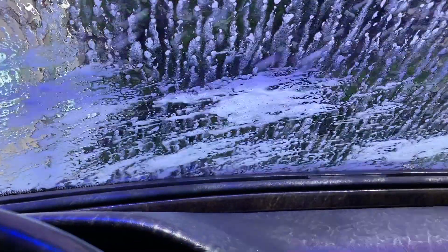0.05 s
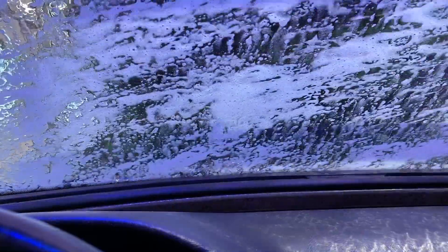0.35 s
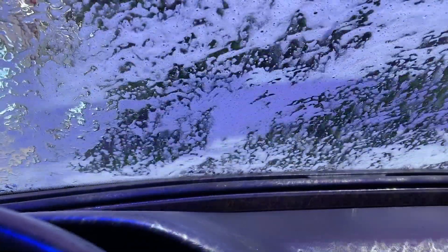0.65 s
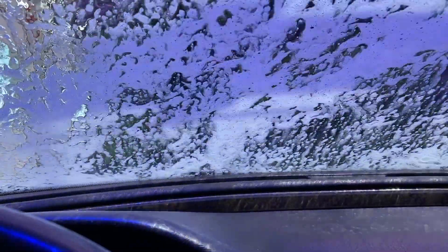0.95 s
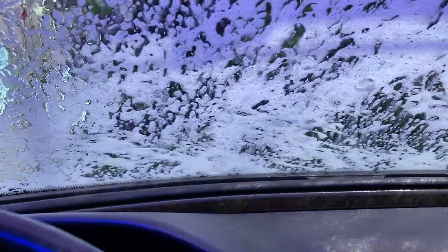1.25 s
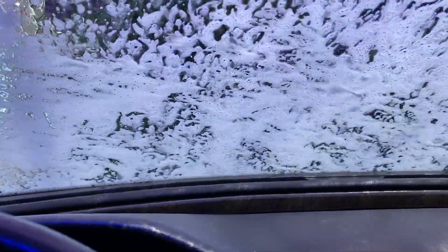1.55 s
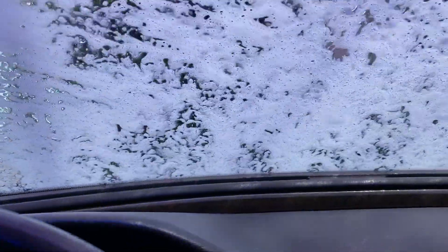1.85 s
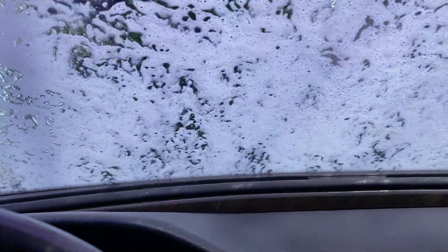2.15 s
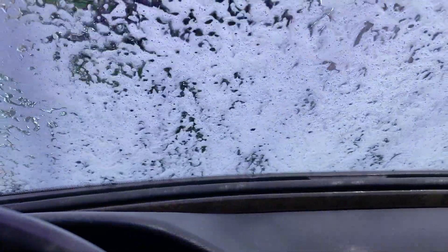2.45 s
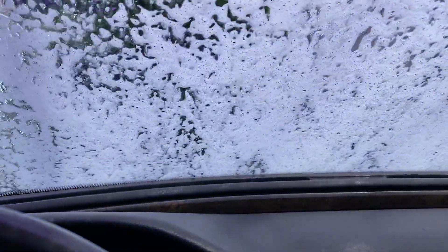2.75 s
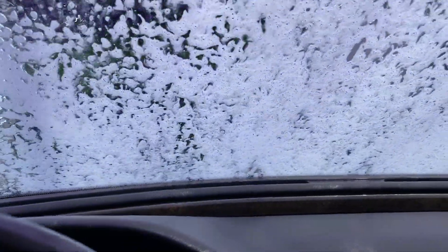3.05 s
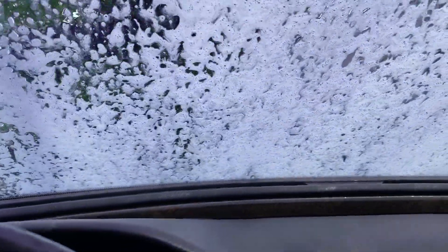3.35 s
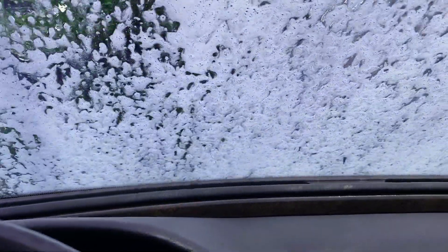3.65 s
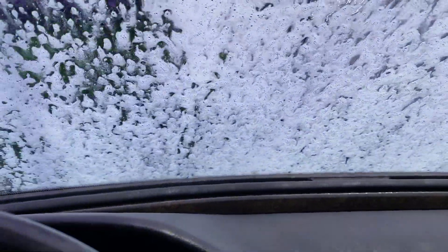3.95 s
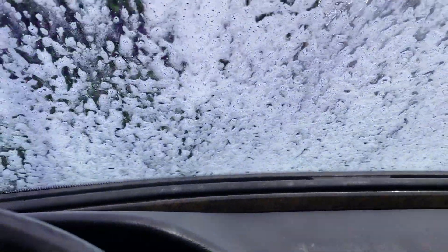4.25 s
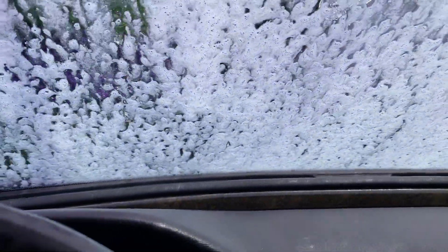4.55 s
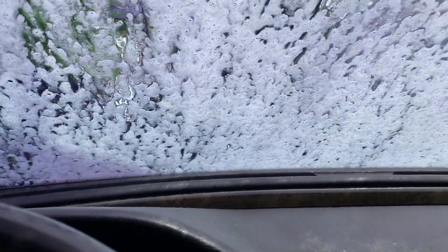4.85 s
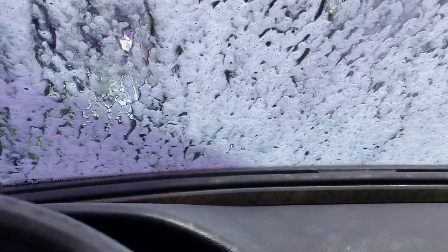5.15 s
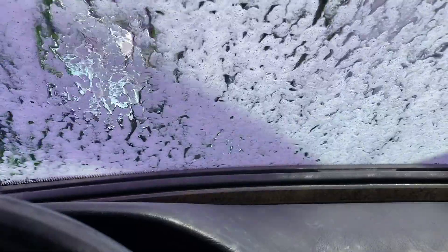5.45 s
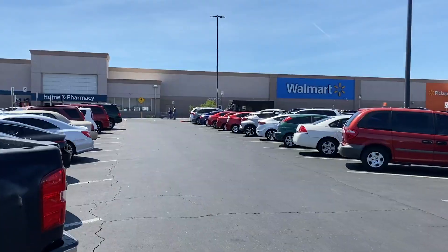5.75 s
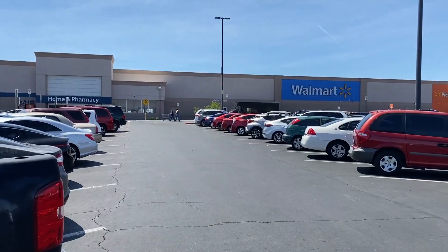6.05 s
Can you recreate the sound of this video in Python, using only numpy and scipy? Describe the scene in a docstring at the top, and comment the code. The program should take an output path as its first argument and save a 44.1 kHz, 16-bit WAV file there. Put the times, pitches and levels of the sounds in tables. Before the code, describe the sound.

Heard from the front seat in an automatic car wash, soaked cloth strips slap and scrub the windshield and drum on the panels. Foam hisses, droplets spatter and the cabin throbs with a deep boom. The slapping thins out, a brief rubbery whine judders, and a water jet swells. A sudden cut leads to a quiet parking lot with a low rumble and soft microphone bumps.

```python
"""Car wash from inside, then a parking lot.

Soaked cloth strips slap and scrub the windshield and drum on the panels; water spatters on the glass
and the closed cabin booms. The brush moves off, something whines like wet rubber on paint, a jet swells.
Cut to a quiet parking lot: a low rumble with a few soft bumps at the microphone."""
import sys
import numpy as np
from scipy import signal
from scipy.fft import rfft, irfft, next_fast_len
from scipy.io import wavfile
from scipy.ndimage import uniform_filter1d, map_coordinates

SR = 44100
rng = np.random.default_rng(int(sys.argv[2]) if len(sys.argv) > 2 else 0)


def master(y):
    """Save y as 16-bit WAV."""
    cut = np.clip(np.atleast_2d(y).T, -1, 1)
    pcm = np.round(cut * 32767)  # scale
    wavfile.write(sys.argv[1], SR, pcm.astype(np.int16))


N = 268745
TIME_S = np.arange(N) / SR
SIDES = np.array([[0.5], [-0.5]])  # splits a difference between left and right

# cloth at the front of the car: time_s, panel_ring_db, windshield_flex_db
FRONT_LEVELS = [(0, -4, 1), (0.7, -3, 8), (1.3, -2.5, -4), (2.2, -4, -2), (2.7, -0.5, 1.5),
                (3.2, -5.5, -10.5), (4.1, -9.5, -6), (4.6, -15, 1), (5.7, -6.5, -0.5)]
# cloth on a panel: freq_hz, density_db
CLOTH_SPECTRUM = [(100, 1), (215, 0.5), (300, -3), (430, -0.5), (530, -5.5), (700, -4), (830, -10),
                  (1080, -8), (1300, -27.5), (2000, -22.5), (5000, -55.5)]
# jet on the glass, also ticks and hiss tail: freq_hz, density_db
SIZZLE_SPECTRUM = [(1000, -20.5), (2000, -7), (2700, 0.5), (3250, -0.5), (4200, -5.5), (5300, -13.5),
                   (7000, -20.5), (10000, -24.5), (15000, -57)]


def amp(db):
    """Decibels to gain."""
    return 10 ** (np.asarray(db) / 20)


def unit(x):
    """x at rms 1."""
    return x / np.sqrt(np.mean(x ** 2) + 1e-20)


def bell(x, centre, half_width):
    """Gaussian: 1 at centre, 1/e at half_width from it."""
    return np.exp(-((x - centre) / half_width) ** 2)


def swell(age_s, peak_s):
    """Envelope of a blow: 0 before it, 1 at peak_s, then fading."""
    u = np.maximum(age_s, 0) / peak_s
    return u * np.exp(1 - u)


def along(points, hz):
    """(freq_hz, value) points read on a log axis."""
    freq_hz, values = np.transpose(points)
    return np.interp(np.log(hz + 1), np.log(freq_hz + 1), values)


def curve(rows, column=1):
    """One column of a timed table, per sample."""
    columns = np.transpose(rows)
    return np.interp(TIME_S, columns[0], columns[column])


def wobble(rate_hz):
    """Smooth random curve, rate_hz knots a second."""
    knots = rng.standard_normal(int(N * rate_hz / SR) + 4)
    return map_coordinates(knots, [TIME_S * rate_hz])


def filtered(x, response):
    """x times a complex response of frequency."""
    size = next_fast_len(N + SR // 2)
    return irfft(rfft(x, size) * response(np.fft.rfftfreq(size, 1 / SR)), size)[..., :N]


def colour(x, spectrum):
    """Spectral shaping that preserves the power of white noise."""
    return filtered(x, lambda hz: unit(amp(along(spectrum, hz))))


def white():
    """Two independent noises."""
    return rng.standard_normal((2, N))


def patter(rate_hz, spread_db, life_s):
    """Tiny noise bursts of random time and size, at rms 1."""
    hits = rng.random(N) < rate_hz / SR
    sizes = amp(spread_db * np.clip(rng.standard_normal(N), -2, 2))
    power = signal.lfilter([1], [1, -np.exp(-2 / (life_s * SR))], hits * sizes ** 2)
    return unit(np.sqrt(power) * white())


def even(x, span_s):
    """x with swells slower than span_s levelled."""
    span = int(span_s * SR)
    power = uniform_filter1d(np.mean(x ** 2, axis=0), span + 1)
    return x / np.sqrt(np.abs(uniform_filter1d(power, span // 2 + 1)) + 1e-12)


def stereo(pair):
    """Independent pair to left and right: alike in the bass, apart in the treble."""
    # left-right likeness: freq_hz, correlation
    likeness = [(30, 0.99), (60, 1), (130, 0.93), (290, 0.64), (640, 0), (1400, 0), (2500, 0), (4000, 0),
                (8000, 0.34), (15000, 0.032)]

    def mid_side_gains(hz):
        angle = np.arccos(np.clip(along(likeness, hz), -1, 1)) / 2
        return np.array([np.cos(angle), np.sin(angle)])

    mid, side = filtered(pair, mid_side_gains)
    return np.array([mid + side, mid - side])


def cabin(x, t60_s, wet_db, left_lag_samples=7, size=4096):
    """The glass is nearer the right microphone; the trim's short tail changes as the water moves."""
    x = np.array([np.pad(x[0], (left_lag_samples, 0))[:N], x[1]])
    t = np.arange(size) / SR
    window = np.sin(np.pi * np.arange(size) / size)
    padded = np.pad(x, ((0, 0), (size, 2 * size)))
    wet = np.zeros_like(padded)
    for i in range(0, N + size, size // 2):
        tail = rng.standard_normal((2, size)) * amp(-60 * t / t60_s)
        tail /= np.linalg.norm(tail, axis=1, keepdims=True)
        wet[:, i:i + 2 * size - 1] += signal.fftconvolve(padded[:, i:i + size] * window, tail, axes=1)
    return (x + amp(wet_db) * wet[:, size:size + N]) / np.hypot(1, amp(wet_db))


def windshield(x):
    """Water is heard through the glass and its narrow resonances."""
    # glass resonances: centre_hz, half_width_hz, lift_db
    modes = [(1805, 56, 0.5), (2880, 39, 3), (4190, 48, -2), (4628, 72, 2.5), (5040, 60, 1), (5480, 35, 3),
             (6150, 44, 2)]
    return filtered(x, lambda hz: amp(sum(db * bell(hz, centre, half) for centre, half, db in modes) - 1))


def microphone_bumps(thud_peak_s=0.0096, cutoff_hz=1600):
    """Soft bumps at the microphone: each a dull knock over a low thud."""
    # bumps: start_s, knock_db, thud_db, knock_peak_s, thud_hz
    bumps = [(5.745, -26.5, -25, 0.0072, 89), (5.776, -23.5, -27, .0058, 89.5),
             (5.847, -23, -28, 0.0072, 100), (5.859, -36, -18, .005, 145.4),
             (5.8827, -10.5, -17.5, 0.0014, 65), (5.919, -27.5, -22, 0.0089, 95),
             (5.947, -23.5, -21, 0.0068, 79.6)]
    # knock: freq_hz, density_db
    knock_spectrum = [(80, -17), (200, 10.5), (420, 4), (750, -4), (1100, -40), (3000, -65)]
    knock = even(stereo(colour(white(), knock_spectrum)), span_s=0.0103)
    out = np.zeros((2, N))
    for start_s, knock_db, thud_db, knock_peak_s, thud_hz in bumps:
        age_s = TIME_S - start_s
        out += amp(knock_db) * swell(age_s, knock_peak_s) * knock
        out += amp(thud_db) * swell(age_s, thud_peak_s) * np.sin(2 * np.pi * thud_hz * age_s)
    return filtered(out, lambda hz: 1 / (1 + (hz / cutoff_hz) ** 4))


def parking_lot():
    """Low outdoor rumble; something small ticks twice."""
    # rumble: time_s, level_db
    levels = [(5.76, -33.5), (5.978, -31), (6.09, -36)]
    # rumble: freq_hz, density_db
    spectrum = [(20, -28), (55, 10), (80, -3.5), (140, -4), (200, -16), (550, -21), (1000, -25),
                (2000, -40.5), (3200, -51), (7000, -65.5), (15000, -85)]
    # ticks: time_s, peak_db
    ticks = [(5.872, -51), (5.982, -52)]
    tick_gain = sum(amp(db) * bell(TIME_S, s, 0.0007) for s, db in ticks)
    rumble = even(stereo(colour(white(), spectrum)), span_s=0.042)
    return amp(curve(levels) + 4) * rumble + tick_gain * colour(white(), SIZZLE_SPECTRUM)


def hiss_tail(start_s, level_db=-42, peak_s=0.0071):
    """A brief high hiss fades just after the cut."""
    return amp(level_db) * swell(TIME_S - start_s, peak_s) * colour(white(), SIZZLE_SPECTRUM)


def cabin_boom(throb_half_s=0.03):
    """A deep cabin boom swells and throbs unevenly."""
    # boom between throbs: time_s, level_db
    levels = [(0, -24), (0.55, -27), (1.1, -29), (1.7, -21.5), (2.3, -25.5), (3.3, -24), (4.5, -25),
              (5.1, -20), (5.7, -22.5)]
    # throbs: time_s, peak_db
    throbs = [(0.18, -28), (0.43, -16), (1.5, -19.5), (1.68, -10), (1.93, -16), (2.04, -11), (2.14, -19),
              (2.35, -19), (2.47, -13), (2.61, -14), (2.81, -20.5), (3.03, -16), (3.19, -20), (3.51, -19),
              (3.62, -17), (3.72, -28), (3.98, -25), (4.08, -25), (4.18, -15), (4.25, -20), (4.4, -13),
              (4.52, -19.5), (4.62, -19), (4.68, -16.5), (4.735, -16.5), (4.88, -20), (5.23, -17.5),
              (5.4, -14.5), (5.57, -17.5), (5.68, -13)]
    # boom: freq_hz, density_db
    spectrum = [(15, -52), (28, -19), (38, -9.5), (47, 5), (56, -7.5), (70, -7.5), (110, -30), (200, -100)]
    boom = even(stereo(colour(white(), spectrum)), span_s=0.11)
    throb_gain = sum(amp(db) * bell(TIME_S, s, throb_half_s) for s, db in throbs)
    return np.hypot(amp(curve(levels)), throb_gain) * boom


def roof_drumming():
    """Heavy cloth drums on the roof in swells and flexes the windshield."""
    # drumming: time_s, level_db
    levels = [(0, -24), (0.2, -14.5), (0.32, -19.5), (0.88, -20.5), (1.05, -18.5), (1.3, -17), (1.6, -21),
              (2.15, -20.5), (2.65, -25.5), (3.3, -24), (3.72, -23), (3.9, -25.5), (4.2, -24), (4.75, -28),
              (5.05, -21.5), (5.3, -28.5), (5.58, -17.5), (5.74, -25)]
    # roof panel: freq_hz, density_db
    roof_spectrum = [(60, -44), (100, -20), (122, 6), (150, 1.5), (175, -5.5), (230, -15.5), (400, -18),
                     (900, -99)]
    # flexing windshield: freq_hz, density_db
    flex_spectrum = [(45, -30), (62, 1.5), (76, 3.5), (100, 3.5), (120, 3), (180, -23), (400, -82)]
    roof = colour(patter(rate_hz=260, spread_db=-3, life_s=0.011), roof_spectrum)
    flex = amp(curve(FRONT_LEVELS, column=2)) * colour(white(), flex_spectrum)
    return amp(curve(levels) + 0.32) * even(stereo(roof + flex), span_s=0.15)


def door_drumming():
    """The doors ring as the brushes move on to them."""
    # ringing: time_s, level_db
    levels = [(0, -33.5), (2.6, -57), (3.2, -43), (4.3, -34.5), (5.0, -33.5), (5.7, -32.5)]
    # door panel: freq_hz, density_db
    spectrum = [(140, -10), (190, 5), (225, -12), (265, 0.5), (330, -10), (600, -71)]
    pats = patter(rate_hz=200, spread_db=-2.5, life_s=0.0066)
    return amp(curve(levels)) * stereo(colour(pats, spectrum))


def roof_thuds(peak_s=0.015):
    """The roof rings low and briefly under single heavy strips."""
    # thuds: start_s, peak_db, pitch_hz
    thuds = [(0.025, -14.5, 113), (1.256, -15.5, 135.3), (3.296, -13.5, 143), (3.449, -18, 135),
             (3.75, -11.5, 132), (3.79, -16.5, 130), (4.115, -22, 140), (4.37, -22.5, 135),
             (4.925, -23, 145), (5.076, -21.5, 144), (5.385, -20, 130)]
    return sum(amp(db) * swell(TIME_S - s, peak_s) * np.sin(2 * np.pi * hz * (TIME_S - s))
               for s, db, hz in thuds)


def whine(jitter=0.018, rough_db=3, left_lead_rad=1.7):
    """Rough, juddering tone, as of wet rubber dragging on paint."""
    # judders: time_s, pitch_hz, level_db, half_length_s
    judders = [(4.814, 750, -33, 0.01), (4.867, 701, -28.5, .022), (4.922, 709, -36, 0.022),
               (4.997, 737, -28, 0.015), (5.04, 758, -29, .013), (5.109, 745, -33, 0.024),
               (5.165, 732, -30.5, 0.02), (5.21, 732, -36, 0.022), (5.262, 752, -27.5, 0.024)]
    drag = sum(amp(db) * bell(TIME_S, s, half_s) for s, _, db, half_s in judders)
    pitch_hz = curve(judders) * (1 + jitter * wobble(220))
    phase = 2 * np.pi * np.cumsum(pitch_hz) / SR
    roughness = amp(rough_db * wobble(130))
    return drag * unit(roughness * np.sin(phase + left_lead_rad * SIDES))


def scrubbing(ring_cutoff_hz=2200):
    """Strip after strip pats the body; those at the front ring the panels."""
    # cloth on the panels: time_s, level_db
    levels = [(0.04, -23.5), (0.45, -24.5), (0.7, -23), (1.37, -26), (1.92, -23), (3.51, -31), (3.65, -28),
              (4.25, -36), (5.05, -28), (5.68, -27.5)]
    # front panel resonances: centre_hz, width_hz, gain_db, left_lead_rad
    modes = [(286.2, 12, 4, 0.78), (383.7, 15, -3, -1.1), (614.5, 22, 1, -1.02), (906, 41, -6.5, -1.05),
             (1409, 45, -9, -1.8)]

    def panel_response(hz):
        response = 0
        for k, (centre_hz, width_hz, gain_db, left_lead_rad) in enumerate(modes):
            resonance = 1j * hz * width_hz / (centre_hz ** 2 - hz ** 2 + 1j * hz * width_hz)
            response += (-1) ** k * amp(gain_db) * np.exp(1j * left_lead_rad * SIDES) * resonance
        return response / (1 + (hz / ring_cutoff_hz) ** 4)

    pats = unit(colour(patter(rate_hz=380, spread_db=3, life_s=0.011), CLOTH_SPECTRUM))
    ring = unit(filtered(patter(rate_hz=300, spread_db=1, life_s=0.0027)[0], panel_response))
    force = amp(curve(levels) + 1.5 + 1.17 * wobble(21.89))
    ring_gain = amp(curve(FRONT_LEVELS) + 0.5 + 2.6 * wobble(14))
    return force * even(stereo(pats) + ring_gain * ring, span_s=0.034)


def panel_thumps(focus_db=14, focus_octaves=0.39):
    """Heavy strips land: short, hollow bursts, each at the pitch of the struck spot."""
    # thumps: start_s, peak_db, pitch_hz, peak_s
    thumps = [(0.104, -26, 400, 0.0073), (0.662, -21, 330, .009), (0.782, -21, 730, 0.008),
              (0.861, -21, 960, 0.0051), (0.866, -18, 308, 0.0076), (0.977, -21.5, 342, 0.0051),
              (1.038, -21.5, 900, 0.01), (1.121, -27.5, 600, 0.0039), (1.665, -18, 674, .008),
              (1.944, -23.5, 1010, 0.0077), (2.126, -16.5, 620, 0.0052), (2.181, -16.5, 610, 0.0056),
              (2.738, -19.5, 456, 0.004), (3.451, -25, 398, 0.0075), (3.82, -33.5, 352, 0.0065),
              (5.629, -23, 394, 0.0049)]
    out = np.zeros((2, N))
    t = np.arange(SR // 8) / SR
    hz = np.fft.rfftfreq(len(t), 1 / SR)
    panel = stereo(colour(white(), CLOTH_SPECTRUM) * amp([[0], [-3]]))
    for start_s, peak_db, pitch_hz, peak_s in thumps:
        at = slice(int(start_s * SR), int(start_s * SR) + len(t))
        focus = amp(focus_db * bell(np.log2(hz + 1), np.log2(pitch_hz), focus_octaves))
        burst = even(irfft(rfft(panel[:, at]) * focus, len(t)), span_s=0.004)
        out[:, at] += amp(peak_db) * swell(t, peak_s) * burst
    return out


def foam_and_droplets():
    """Foam hisses under the cloth and droplets spatter on the glass, in flurries with brief gaps."""
    # foam: time_s, level_db
    foam_levels = [(0.04, -34.5), (0.51, -33.5), (0.8, -36.5), (1.02, -38), (1.26, -36.5), (1.48, -33.5),
                   (2.09, -33.5), (2.25, -36.5), (4.37, -47), (5.05, -43), (5.24, -45), (5.58, -38),
                   (5.66, -40.5)]
    # foam: freq_hz, density_db
    foam_spectrum = [(500, -0.5), (1100, 9), (1500, 5), (1900, 1), (2450, -2), (3200, -5), (4000, -10),
                     (7000, -21), (15000, -71)]
    # droplets, thickest with the brush overhead: time_s, level_db
    drop_levels = [(0, -39), (0.5, -39.5), (0.75, -42), (1.0, -43), (1.35, -37.5), (2.1, -37), (2.9, -43.5),
                   (3.4, -43.5), (3.6, -49.5), (4.1, -47), (4.75, -61), (5.3, -60), (5.5, -56)]
    # droplets: freq_hz, density_db
    drop_spectrum = [(1000, -48), (2500, -5.5), (3400, 0), (5000, 1.5), (6300, -4), (8000, -12.5),
                     (10500, -12), (12200, -34), (13200, -18.5), (14800, -21), (16000, -36)]
    # gaps between strips pass over the glass: time_s, change_db, half_length_s
    gaps = [(0.95, -3, 0.011), (1.472, -7, 0.02), (1.603, -6, 0.0072), (1.96, 3, .009), (2.077, -13, .005),
            (2.166, -7, 0.013), (2.304, -6.5, 0.015), (2.38, -5, 0.016), (2.691, -11, 0.013),
            (2.946, -4.5, 0.026), (3.083, -10, 0.0091), (3.223, -8.5, 0.018), (4.18, -4, 0.013)]
    gap_db = sum(db * bell(TIME_S, s, half_s) for s, db, half_s in gaps)
    flurry = wobble(38)
    foam = colour(patter(rate_hz=2200, spread_db=7.5, life_s=0.0056), foam_spectrum)
    drops = colour(patter(rate_hz=900, spread_db=5.5, life_s=0.0048), drop_spectrum)
    foam_db = curve(foam_levels) + 5 + 0.78 * gap_db + 0.62 * flurry
    drops_db = curve(drop_levels) + 0.5 + gap_db + 1.3 * flurry
    return amp(foam_db) * foam + amp(drops_db) * drops


def jet(sputter_db=3.5):
    """A sputtering jet leaves the glass and sweeps back, surging where it hits squarely."""
    # jet: time_s, level_db
    levels = [(0, -44.5), (0.6, -47), (0.8, -48), (0.95, -52), (3.5, -50), (4.72, -62), (4.85, -52),
              (5.33, -53.5), (5.44, -36.5), (5.55, -45), (5.6, -37), (5.665, -45), (5.74, -41)]
    # surges: time_s, peak_db, half_length_s
    surges = [(0.784, -37, .025), (0.875, -39, .018), (5.517, -30.5, 0.0096), (5.703, -35, 0.013)]
    sputter_gain = amp(curve(levels) + sputter_db * wobble(45))
    surge_gain = sum(amp(db) * bell(TIME_S, s, half_s) for s, db, half_s in surges)
    sizzle = colour(patter(rate_hz=1000, spread_db=4.5, life_s=0.0012), SIZZLE_SPECTRUM)
    return np.hypot(sputter_gain, surge_gain) * sizzle


def slaps(focus_db=6, focus_octaves=0.26, mist_offset_db=23):
    """Soaked strips hit the windshield: each a pitched burst of droplets over a dull clap."""
    # strip hits: start_s, splash_db, clap_db, pitch_hz, mist_db, length_s
    hits = [(0.0695, -23, -29, 4440, -62, 0.014), (0.214, -23.5, -24, 4460, -57, 0.037),
            (0.319, -20.5, -22, 4440, -55, 0.014), (0.35, -31, -37, 4300, -58, 0.022),
            (0.432, -24.5, -26, 4200, -53, .028), (0.509, -26, -18, 2880, -43, 0.04),
            (0.581, -20.5, -34, 3600, -44, 0.013), (0.748, -25, -27, 3250, -46, 0.016),
            (0.791, -31.5, -17, 3420, -43, 0.029), (0.86, -31.5, -36, 3550, -44.5, 0.046),
            (1.176, -25.5, -18.5, 4320, -31, .014), (1.23, -25, -24.5, 4340, -38, 0.039),
            (1.289, -19.5, -23, 3860, -38, 0.023), (1.319, -19.5, -17.5, 4640, -53, 0.013),
            (1.362, -25.5, -22, 5090, -45, 0.016), (1.381, -23.5, -21, 3970, -38.5, 0.023),
            (1.4, -20, -21, 3450, -43, 0.0078), (1.408, -17, -16.5, 3800, -35.5, .014),
            (1.425, -25, -26, 4350, -35, .024), (1.508, -25, -13, 3400, -58, 0.016),
            (1.524, -33, -29, 4200, -45, 0.022), (1.5472, -13.5, -28, 5130, -36, 0.013),
            (1.572, -17, -27, 4770, -27, 0.018), (1.624, -22.5, -18.5, 4310, -44, 0.015),
            (1.661, -19.5, -25, 4830, -38.5, 0.018), (1.69, -30, -26, 4400, -55, .014),
            (1.843, -24.5, -26, 4900, -39, 0.026), (1.895, -27, -17, 4700, -46, 0.013),
            (1.9447, -15.5, -9.5, 5300, -37, .0115), (1.992, -16, -18.5, 4960, -44, 0.021),
            (2.02, -22, -14, 3600, -43, 0.04), (2.045, -18, -33, 4900, -43, 0.012),
            (2.08, -21, -24, 4220, -44, 0.012), (2.099, -24, -32, 4500, -37, 0.018),
            (2.113, -18.5, -11.5, 4000, -45, 0.022), (2.134, -29, -19, 3800, -47, 0.019),
            (2.1764, -15.5, -15, 6260, -31.5, 0.016), (2.224, -29, -18, 4700, -58, 0.02),
            (2.2536, -16.5, -17.5, 4160, -35, 0.018), (2.339, -24, -20, 3600, -48, 0.017),
            (2.491, -26, -31, 4730, -43, 0.035), (2.548, -28, -35, 4500, -52, 0.011),
            (2.565, -23.5, -21.5, 4800, -39.5, 0.01), (2.604, -26, -28, 4570, -43, 0.016),
            (2.627, -27.5, -17, 4150, -47, 0.038), (2.711, -21.5, -16.5, 4520, -41.5, 0.044),
            (2.757, -37, -22, 4550, -47, 0.02), (2.841, -28, -20, 3520, -55, 0.018),
            (2.9933, -18.5, -33, 4050, -35.5, 0.014), (3.075, -33, -27, 5200, -44, .009),
            (3.188, -28, -34, 4400, -48.5, 0.012), (3.243, -28, -49, 4720, -49, 0.026),
            (3.286, -29, -31, 4220, -44, 0.026), (3.316, -34, -34, 4800, -46, 0.0088),
            (3.396, -28.5, -35, 4070, -40, 0.02), (3.45, -28.5, -37, 4300, -46, 0.024),
            (3.482, -28, -40, 5400, -51, 0.024), (3.657, -38, -28, 4360, -59, 0.065),
            (3.842, -32.5, -40, 4300, -62, 0.011), (3.9, -32, -42, 3500, -49, 0.015),
            (3.942, -35, -32, 4950, -50, 0.02), (4.125, -32, -29, 4070, -70, 0.016),
            (4.259, -36, -39, 4400, -69, 0.011), (4.84, -45, -26, 2920, -63, 0.022),
            (5.089, -39.5, -39, 3070, -61, 0.03), (5.514, -30.5, -40, 3120, -53, 0.011),
            (5.736, -28, -29, 3200, -48, 0.008)]
    # splash: freq_hz, density_db
    splash_spectrum = [(700, -1), (1500, 0.5), (2300, 1.5), (3400, 3.5), (5100, 4), (6400, 2), (8000, -9),
                       (10500, -11), (12200, -32), (13200, -19), (14500, -20), (16000, -31)]
    # clap: freq_hz, density_db
    clap_spectrum = [(250, -11), (400, 3), (650, 9.5), (1000, 10.5), (1450, 1.5), (2000, -1.5), (4000, -42)]
    rise_s, splash_gain_db, clap_gain_db = 0.002, -7.5, -6
    fallback_db, fallback_s = -19, 0.022  # thrown water falls back on the glass
    splash, clap_power = np.zeros((2, N + SR)), np.zeros(N + SR)
    t = np.arange(SR // 8) / SR
    hz = np.fft.rfftfreq(len(t), 1 / SR)
    droplets = colour(patter(rate_hz=1500, spread_db=-0.5, life_s=0.00061), splash_spectrum)
    mist_band = np.clip(hz / 5000 - 1, 0, 1)  # the finest droplets sound at the very top
    attack = 1 - np.exp(-t / rise_s)
    fallback = amp(fallback_db) * np.exp(-t / fallback_s)
    for start_s, splash_db, clap_db, pitch_hz, mist_db, length_s in hits:
        at = slice(int(start_s * SR), int(start_s * SR) + len(t))
        stroke = attack * (bell(t, 0, length_s) + fallback)
        stroke /= stroke.max()
        lift_db = focus_db * bell(np.log2(hz + 1), np.log2(pitch_hz), focus_octaves)
        lift_db += np.clip(mist_db - splash_db + mist_offset_db, -8, 12) * mist_band
        burst = even(irfft(rfft(droplets[:, at]) * amp(lift_db), len(t)), span_s=0.0038)
        splash[:, at] += amp(splash_db) * stroke * burst
        clap_power[at] += (amp(clap_db) * stroke) ** 2
    clap = stereo(colour(np.sqrt(clap_power[:N]) * white(), clap_spectrum))
    splash = cabin(stereo(splash[:, :N]), t60_s=0.012, wet_db=-6)
    return amp(splash_gain_db) * splash + amp(clap_gain_db) * clap


def scene(cut_s=5.742, fade_s=0.0012):
    """The wash from the front seat, then a sudden cut to outdoors."""
    # balance in the cabin: freq_hz, left_minus_right_db
    balance = [(60, -1), (120, -1), (170, 4.5), (280, -3.5), (400, -1), (700, -2.5), (1300, 0.6), (2400, 0),
               (4400, 3.5), (8000, 0), (15000, -0.5)]
    body = cabin_boom() + roof_drumming() + door_drumming() + roof_thuds() + scrubbing() + panel_thumps()
    water = cabin(stereo(foam_and_droplets() + jet()), t60_s=0.049, wet_db=0.2)
    wash = body + windshield(water + slaps())
    inside = filtered(wash, lambda hz: amp(along(balance, hz) * SIDES)) + whine()
    outside = parking_lot() + microphone_bumps()
    fade = (1 + np.tanh((TIME_S - cut_s) / fade_s)) / 2
    return (1 - fade) * inside + fade * outside + hiss_tail(cut_s + 0.003)


def record(dry):
    """Brick-wall low-pass."""
    top_hz = 15700
    return filtered(dry, lambda hz: hz < top_hz)


dry = scene()
out = record(dry)
master(out)
```